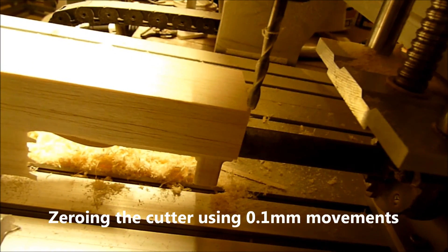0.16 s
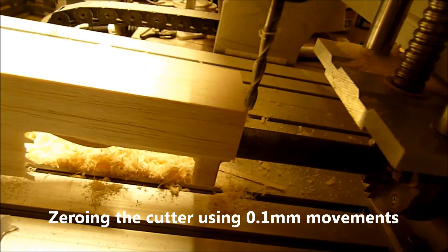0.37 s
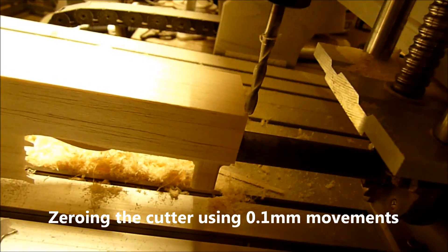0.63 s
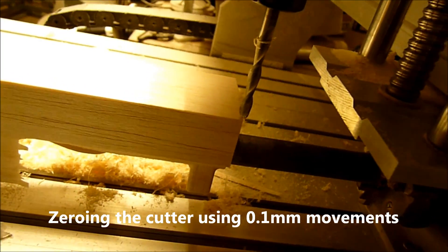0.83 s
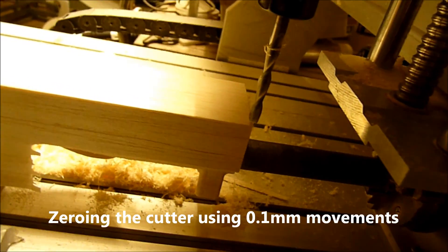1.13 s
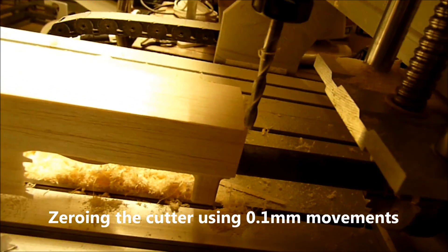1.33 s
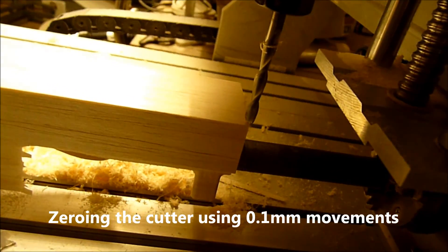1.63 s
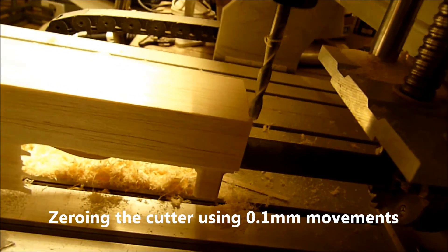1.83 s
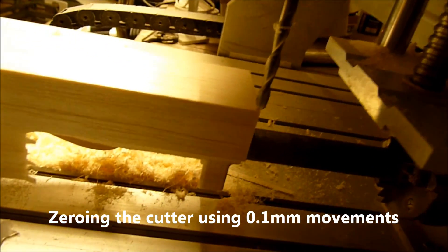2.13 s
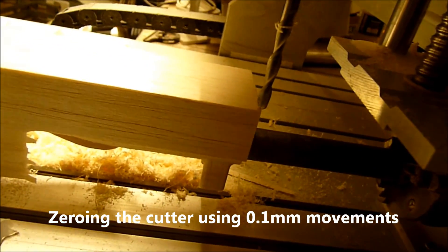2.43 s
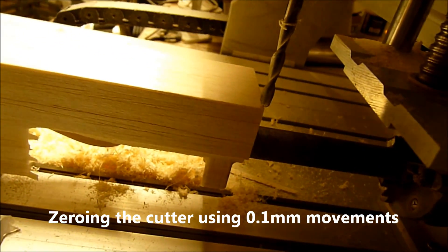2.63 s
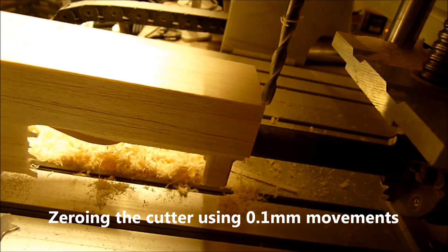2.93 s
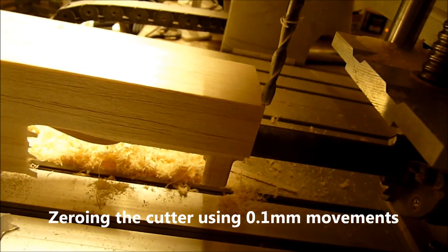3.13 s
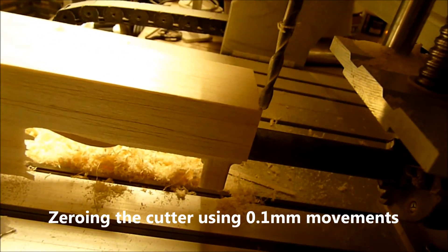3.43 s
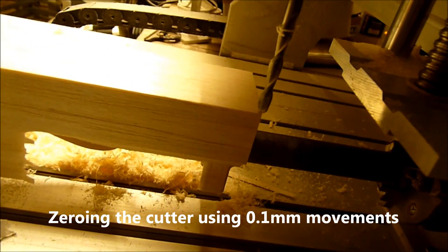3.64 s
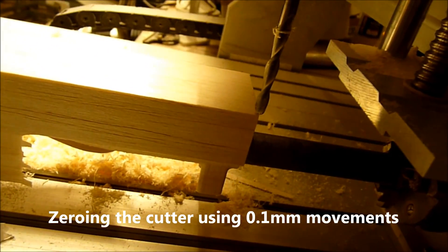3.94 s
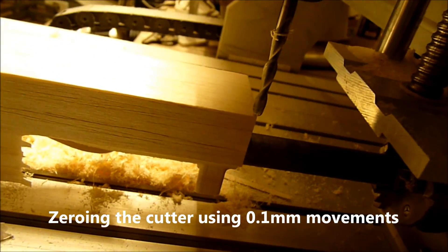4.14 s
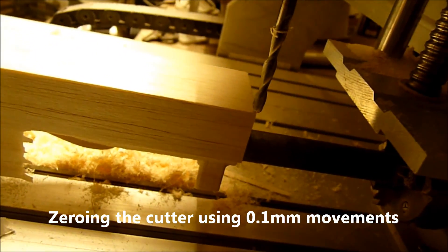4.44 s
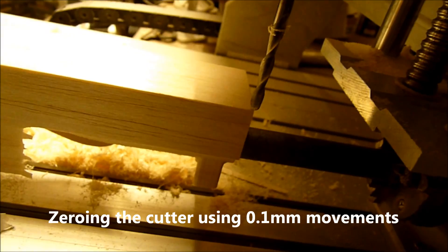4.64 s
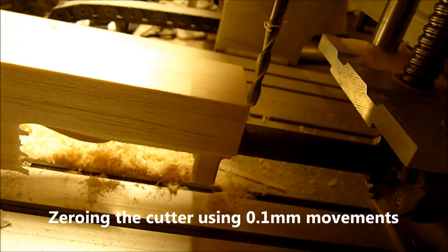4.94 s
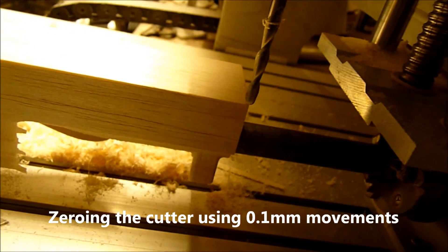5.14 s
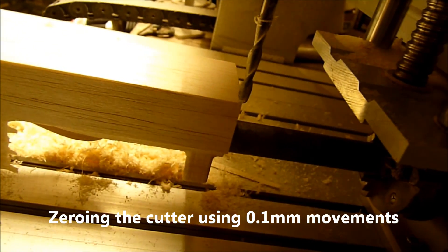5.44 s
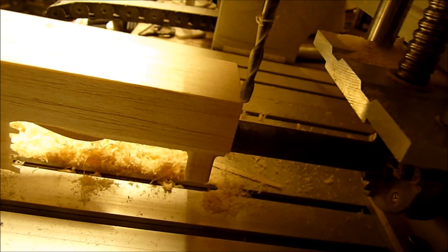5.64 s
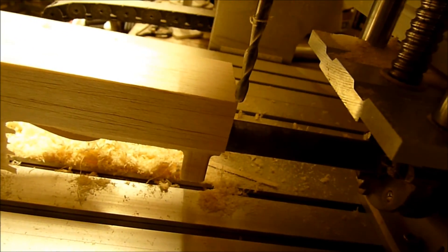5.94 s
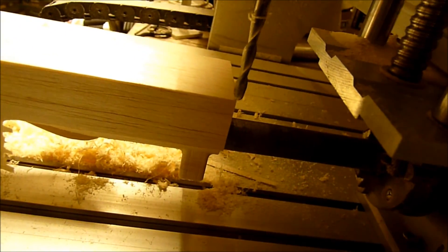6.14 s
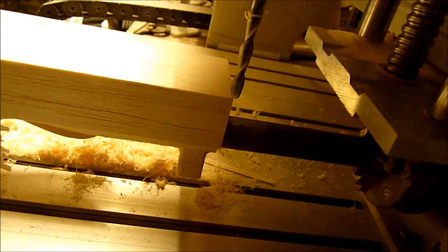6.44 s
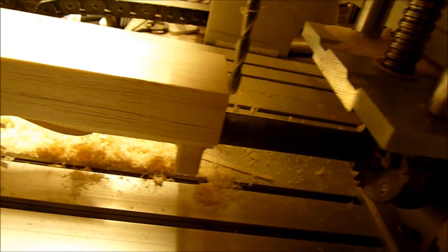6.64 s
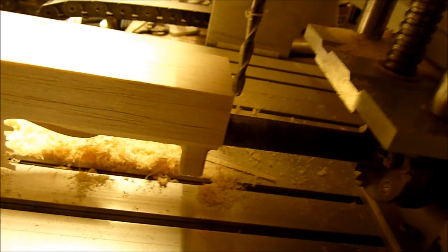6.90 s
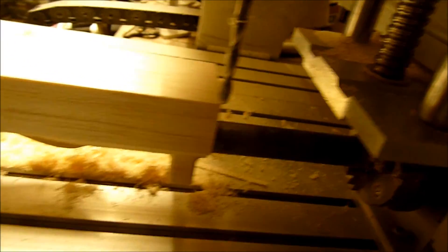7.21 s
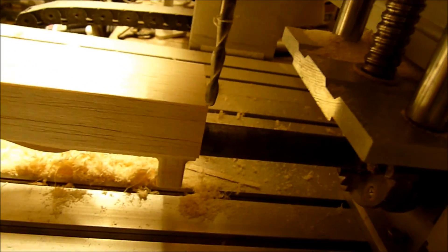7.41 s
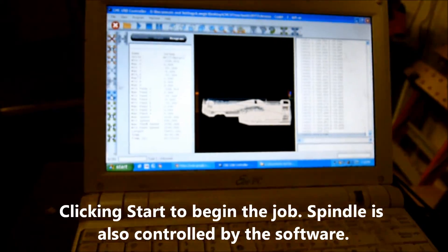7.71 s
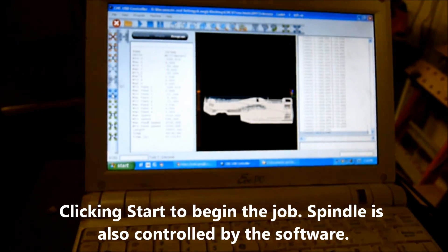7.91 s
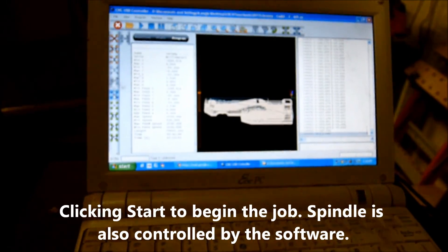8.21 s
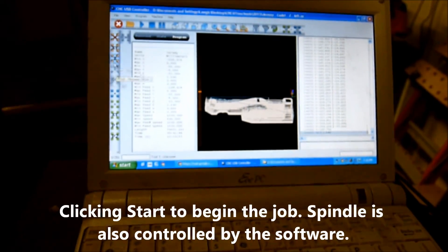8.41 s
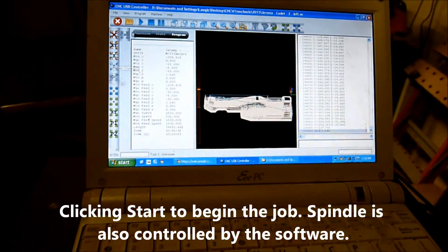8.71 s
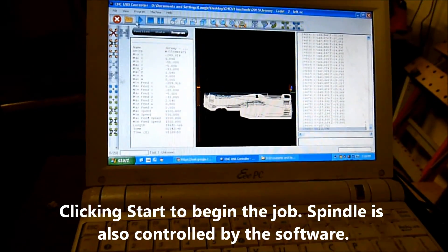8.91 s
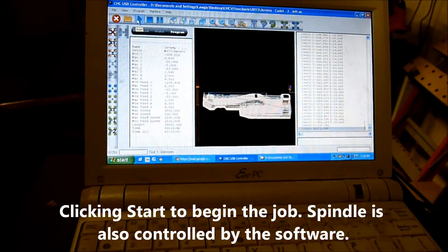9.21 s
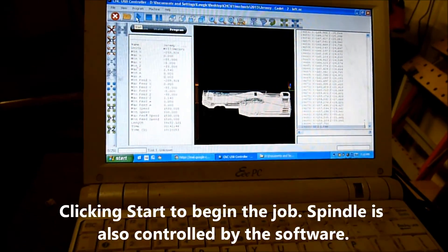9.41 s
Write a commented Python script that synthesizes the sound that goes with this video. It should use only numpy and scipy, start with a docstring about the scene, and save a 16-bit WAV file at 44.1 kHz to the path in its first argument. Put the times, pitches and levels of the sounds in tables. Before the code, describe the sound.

Cooling fans hum throughout in a workshop, with rushing air and a thin electrical whine. Right at the start, a small computer-controlled router close by makes one short move, a motor buzz between two jolts that ring its metal frame. From about 2.3 to 3.2 seconds come four tiny moves, each a brief buzzy knock, along with two faint key ticks. A louder run of ten quick, uneven knocks lasts from 3.4 to 4.9 seconds. Seven more, with a slightly different ring and rattle, follow from 5.4 to 6.7 seconds, while the fan's hum grows a little louder. A light, hard knock sounds at 7.4 seconds. At about 7.7 seconds the sound drops out for an instant, then the fans return with a stronger, higher tone, heard from beside a laptop until the end.

```python
"""Cooling fans hum in a workshop, and a small CNC router (a cutting machine) makes one short move.
Each move is a buzz of motor steps between two jolts, start and stop, that ring the metal frame.
From about 2.3 s come two faint key ticks and three runs of tiny moves, one run along each axis.
During the last run the listener leans toward a fan's outlet; a light knock follows at 7.4 s.
Then, after an instant of silence, the fans are heard from beside the control laptop."""
import sys
import numpy as np
from scipy import signal
from scipy.fft import rfft, irfft
from scipy.io import wavfile
from scipy.ndimage import uniform_filter1d

SR = 44100
rng = np.random.default_rng(int(sys.argv[2]) if len(sys.argv) > 2 else 0)


def dump(signal):
    """Clip the signal to [-1, 1] and save it as 16-bit WAV at the path in sys.argv[1]."""
    limited = np.clip(np.atleast_2d(signal).T, -1, 1)
    pcm = np.round(limited * 32767).astype(np.int16)
    wavfile.write(sys.argv[1], SR, pcm)


N = 421596
TIME = np.arange(N) / SR
RING_TIME = np.arange(SR) / SR  # one second, room for one move or knock to die away


def undb(db):
    """Turn decibels into a number to multiply by."""
    return 10 ** (np.asarray(db) / 20)


def add(track, start_s, sound):
    """Mix a sound into the track at its start time."""
    i = int(start_s * SR)
    track[i:i + len(sound)] += sound[:N - i]


def wander(rate):
    """A smooth random curve, about 1 in size, that heads for a new value `rate` times a second."""
    hold = int(SR / rate)
    stairs = np.repeat(rng.standard_normal(N // hold + 1), hold)
    curve = uniform_filter1d(uniform_filter1d(stairs, hold), hold)[:N]
    return curve / curve.std()


def noise(shape, size, peaks=()):
    """Noise of strength 1, shaped by (Hz, dB) points and by (Hz, width in Hz, dB) peaks or dips."""
    hz = np.arange(size // 2 + 1) * SR / size
    points, db = np.transpose(shape)
    colour_db = np.interp(np.log(hz + 1), np.log(points), db)
    for centre, width, boost_db in peaks:
        colour_db = colour_db + boost_db / (1 + (2 * (hz - centre) / width) ** 2)
    out = irfft(rfft(rng.standard_normal(size)) * undb(colour_db), size)
    return out / out.std()


# The tones of two fans. Each row: multiple of the blade rate, dB at the machine, dB at the laptop.
LOW_FAN = [(1, -46.5, -45.5), (2, -67.5, -60), (5, -78.5, -62), (7, -73.5, -84.5), (8, -72.5, -65),
           (9, -75.5, -71.5), (10, -88, -90), (11, -93.5, -76)]
HIGH_FAN = [(1, -53, -36), (2, -72, -49.5), (3, -59, -60.5), (4, -80, -58.5)]

def fan(tones, places, blade_hz, drift, flutter_db):
    """Passing blades hum; the speed drifts a little and each tone wavers in the swirling air."""
    phase = 2 * np.pi * np.cumsum(blade_hz * (1 + drift * wander(3))) / SR
    out = 0
    for multiple, *levels in tones:
        loudness = np.sqrt(2) * (undb(levels) @ places) * undb(flutter_db * wander(15))
        out = out + loudness * np.sin(round(multiple) * phase + .22 * wander(30))
    return out


# The whine of the motor drivers. Each row: pitch in Hz, dB at the machine, dB at the laptop.
WHINE = [(1167, -71, -70), (6666, -86, -85)]

def driver_whine(places):
    """The circuits that power the motors give off thin, slightly wavering tones."""
    return sum(np.sqrt(2) * (undb(levels) @ places) * np.sin(2 * np.pi * hz * TIME + wander(18))
               for hz, *levels in WHINE)


# The tone colour of the rushing air in each place. Each row: pitch in Hz, relative level in dB.
AIR_MACHINE = [(25, -19.5), (60, -9.5), (140, 0.5), (175, -4), (240, 5.5), (320, 2), (520, 0), (950, 0.5),
               (1150, -16), (1400, -16.5), (2050, -22), (2400, -27), (3600, -31.5), (7800, -34)]
AIR_LAPTOP = [(25, -34.5), (60, -15), (130, -10), (210, 4.5), (300, 1.5), (380, -4.5), (600, -7),
              (710, -7.5), (900, -7), (1100, -20), (1900, -21.5), (2400, -33), (3600, -39), (7800, -43)]
# Pitches that the casing, the outlet and the laptop boost or weaken.
# Each row: pitch in Hz, width in Hz, boost in dB.
CASING_PEAKS = [(214, 36, 5), (366, 7.6, -4.5), (435.3, 23, 6), (612, 34, -8.5), (737, 15, -5.5),
                (904.6, 16, 8), (1012, 28, 4.5)]
OUTLET_PEAKS = [(421.2, 15, 27.5), (729, 51, 21), (925, 76, 27), (1754, 310, 9.5)]
LAPTOP_PEAKS = [(370, 34, -3), (420.7, 29, 12.5), (620, 50, -4), (810, 37, -7.5), (833, 20, 8)]

def rushing_air(places, outlet_gain):
    """Air from the fans rushes through casing and outlet, or past the laptop, and makes them resonate."""
    outlet_shape = [(100, -10.5), (400, 2.5), (1900, -0.5), (3500, -21.5)]
    casing = undb(-40.5) * noise(AIR_MACHINE, N, CASING_PEAKS)
    outlet = undb(-52) * outlet_gain * noise(outlet_shape, N, OUTLET_PEAKS)
    laptop = undb(-36.5) * noise(AIR_LAPTOP, N, LAPTOP_PEAKS)
    air = places[0] * (casing + outlet) + places[1] * laptop
    return air * undb(0.5 * wander(6.6))


# The tone colour of a hollow note in the air. Each row: pitch in Hz, relative level in dB.
HOLLOW_SHAPE = [(560, -46.5), (660, -11.5), (715, 3), (765, -17), (850, -49.5)]
# Its usual level in dB: first at the machine, then at the laptop.
HOLLOW_DB = [-57.5, -54]

def hollow_note(places, swell_db=5.0):
    """A narrow, hollow band of the rushing air swells and fades several times a second."""
    band = (undb(HOLLOW_DB) @ places) * noise(HOLLOW_SHAPE, N)
    return band * undb(swell_db * np.minimum(wander(14), 2))


def ring(hz, fade_s, db, build, delay=0, lag=0):
    """A struck object's notes: each waits `lag` cycles, swells over `build`, falls 60 dB in fade_s."""
    out = 0
    for k, (pitch, fade, level) in enumerate(zip(hz, fade_s, db)):
        t = np.maximum(RING_TIME - delay - lag / pitch, 0)
        loudness = undb(level - 60 * t / fade) * (1 - np.exp(-t * pitch / build))
        out = out + (-1) ** k * loudness * np.sin(2 * np.pi * pitch * t)  # neighbours swing opposite ways
    return out


def gate(start, stop, ramp):
    """Fade in from start and be silent again by stop; all times are in seconds."""
    return np.clip((RING_TIME - start) / ramp, 0, 1) * np.clip((stop - RING_TIME) / ramp, 0, 1)


# The notes of the drive nut. Each row: pitch in Hz, fade time in seconds, relative level in dB.
CLACK_NOTES = [(1540, .025, -10.5), (1850, .035, -1.5), (2150, 0.061, -2.5), (2970, .07, -13)]

def nut_clack(db):
    """The nut clacks against its screw as a move starts."""
    return undb(db) * ring(*np.transpose(CLACK_NOTES), build=1.8, delay=.0008)


# The tone colour of the rattling screw and nut. Each row: pitch in Hz, relative level in dB.
RATTLE_SHAPE = [(30, -21.5), (60, -11.5), (160, -2), (300, 2), (550, 7), (1100, 6), (1400, -3.5),
                (2100, -11.5), (2500, -17.5), (3100, -23), (4000, -36), (8000, -43)]

def screw_rattle(length, step_phase, db, fade_s):
    """The loose nut chatters once per motor step, most at the start and again at the stop."""
    start_shake = undb(-60 * RING_TIME / fade_s)
    stop_shake = 0.43 * (RING_TIME > length) * undb(-60 * np.abs(RING_TIME - length) / fade_s)
    chatter = (1 + 0.28 * np.cos(step_phase)) * noise(RATTLE_SHAPE, SR)
    return undb(db) * (start_shake + stop_shake) * gate(0, 1, ramp=0.0022) * chatter


# The tones of a motor at full speed. Each row: pitch in Hz, relative level in dB.
DRONE_TONES = [(268, -30), (533, -36), (640, -40), (920, -39), (1066, -40)]

def motor_drone(stop_s, run_up_s=0.027, boost_db=5.5, fade_s=0.28):
    """Only a longer move gets up to speed and drones, most strongly at first."""
    tones = sum(undb(db) * np.sin(2 * np.pi * hz * RING_TIME) for hz, db in DRONE_TONES)
    loudness = undb(boost_db - 60 * (RING_TIME - run_up_s) / fade_s)
    return tones * loudness * gate(run_up_s, stop_s, ramp=0.0021)


def move(length, slack, modes, step_hz, step_db, build, lag, rattle_db, rattle_t60, clack_db, slack_db,
         scatter_db=1.2, varying_above_hz=780):
    """One move: a clack and a start jolt, a buzz of steps that rattles the screw, and a stop jolt."""
    hz, fade_s, start_db, stop_db = np.transpose(modes)
    # the frame's low notes ring alike on every move; the high ones vary
    change_db = (scatter_db * rng.standard_normal(len(hz)) + slack * slack_db) * (hz > varying_above_hz)
    start_jolt = ring(hz, fade_s, start_db + change_db, build, lag=lag)
    stop_jolt = ring(hz, fade_s, stop_db + change_db, build, delay=length, lag=lag)
    # the heavy frame rounds off each jolt, dulling it above 1500 Hz
    jolts = signal.sosfiltfilt(signal.butter(4, 1500, fs=SR, output="sos"), start_jolt + stop_jolt)
    clack = nut_clack(clack_db + scatter_db * rng.standard_normal())
    # a move this short never settles on quite the same step rate
    step_phase = 2 * np.pi * step_hz * (1 + .006 * rng.standard_normal()) * RING_TIME
    motor_stop_s = length + 0.0027
    buzz = undb(step_db + slack * slack_db) * gate(0, motor_stop_s, ramp=0.0035) * np.sin(step_phase)
    rattle = screw_rattle(length, step_phase, rattle_db, rattle_t60)
    return (clack + jolts + buzz + motor_drone(motor_stop_s) + rattle) * gate(-1, 1, ramp=0.22)


# The notes (modes) of the frame as each axis shakes it.
# Each row: pitch in Hz, fade time in seconds, dB at the start jolt, dB at the stop jolt.
X_MODES = [(53, 0.1, -57, -35.5), (121, 0.3, -62.5, -37.5), (124.9, 0.52, -28, -63.5),
           (157.7, 0.36, -27, -60), (195, 0.092, -23.5, -21.5), (237, 0.52, -57.5, -38.5),
           (251, 0.077, -39, -22.5), (322, 0.089, -34.5, -25), (348, 0.049, -48.5, -18),
           (456, 0.37, -39.5, -63), (520, 0.16, -63, -38), (605, .16, -55, -50), (647, .38, -37.5, -48),
           (710, .3, -57, -46), (883, 0.063, -26.5, -27), (928, 0.67, -35.5, -73),
           (1005, 0.3, -36.5, -63.5)]
Y_MODES = [(63.6, 0.11, -31.5, -58.5), (98, 0.68, -38, -58), (119.8, 0.26, -23, -23),
           (130, 0.55, -19, -23.5), (148.5, 2.4, -41.5, -52), (185.7, 0.097, -17.5, -59.5),
           (231.4, 0.52, -35, -33.5), (294.1, 0.19, -28.5, -60), (309, 0.064, -56, -17.5),
           (404, 0.066, -66, -32), (450, 0.17, -32.5, -60), (522, .13, -43, -39), (651, .106, -55, -39.5),
           (710, 0.29, -36.5, -56), (843, 0.79, -42, -61.5), (856.4, 0.16, -21, -28.5),
           (928, 0.096, -24.5, -41), (1052, .28, -45.5, -49)]
Z_MODES = [(51.7, 0.063, -31, -50), (96, 0.65, -33.5, -59), (129.8, 0.25, -18.5, -25),
           (156, 0.76, -64, -34), (173.7, 0.85, -44, -52), (198.7, 0.16, -24, -19.5),
           (229.6, 0.6, -48.5, -35.5), (273.6, 0.24, -23, -28.5), (310.3, 0.12, -31.5, -20.5),
           (359.5, 0.24, -34.5, -56.5), (409.5, 0.27, -47.5, -37.5), (524.6, 0.26, -48.5, -36),
           (603, 0.14, -54.5, -39), (633, 0.29, -38.5, -54.5), (720, 0.023, -32, -46.5),
           (941, 0.081, -40, -28), (1105, 0.18, -64.5, -47)]
# The drive of each axis. Each entry: frame notes, step rate in Hz, buzz in dB, build and lag in cycles,
# rattle in dB, its fade time in seconds, clack in dB, dB that full slack adds to buzz and high notes.
AXES = {"X": dict(modes=X_MODES, step_hz=913, step_db=-43.5, build=0.52, lag=0.072, rattle_db=-43.5, rattle_t60=.11, clack_db=-51, slack_db=2.5),
        "Y": dict(modes=Y_MODES, step_hz=898.6, step_db=-27, build=1.39, lag=0.51, rattle_db=-37, rattle_t60=0.11, clack_db=-55.5, slack_db=-3.5),
        "Z": dict(modes=Z_MODES, step_hz=967, step_db=-36, build=0.11, lag=0.66, rattle_db=-39.5, rattle_t60=0.23, clack_db=-46, slack_db=-0.5)}
# Runs of equal tiny moves on one axis, in quick, uneven succession. Each row: start in seconds, axis,
# length of a move in seconds, waits before each further move in clock beats.
RUNS = [(.0175, "X", .097, []), (2.3748, "X", .0142, [26, 15, 7]),
        (3.422, "Y", .0203, [13, 11, 9, 10, 9, 11, 7, 9, 10]), (5.4045, "Z", .0124, [14, 9, 11, 13, 9, 25])]

def router(clock_hz=64.035, slack_moves=1.9):
    """The moves of a run fall on the controller's clock; the first few take up the nut's slack."""
    out = np.zeros(N)
    for start_s, axis, length, waits in RUNS:
        for count, beat in enumerate(np.cumsum([0] + waits)):
            slack = np.exp(-count / slack_moves)
            add(out, start_s + beat / clock_hz, move(length, slack, **AXES[axis]))
    return out


def workshop_echo(sound, echo_db=-19, fade_s=0.17):
    """Walls and benches add a short echo to the sound, with hardly any bass in it."""
    tail = noise([(200, -20), (450, -2), (1500, 0), (6000, -6)], SR)
    tail = tail * undb(-60 * RING_TIME / fade_s) * gate(0.019, 1, ramp=0.018)
    echo = signal.fftconvolve(sound, tail / np.sqrt(np.sum(tail ** 2)))[:N]
    return sound + undb(echo_db) * echo


# Faint ticks of a key. Each row: start in seconds, pitch in Hz, level in dB.
KEY_TICKS = [(2.346, 2600, -50), (3.0065, 2640, -45)]

def key_ticks(fade_s=0.014):
    """A plastic key ticks with three short notes that lie close together."""
    out = np.zeros(N)
    for start_s, hz, db in KEY_TICKS:
        add(out, start_s, ring([0.96 * hz, hz, 1.09 * hz], [fade_s] * 3, [db] * 3, build=2))
    return out


# The light knock. Each row: start in seconds, change of level in dB.
KNOCKS = [(7.437, -2.5)]
# The notes it rings. Each row: pitch in Hz, fade time in seconds, relative level in dB.
KNOCK_NOTES = [(248, 0.047, -17), (430, 0.069, -26), (674, 0.074, -22.5), (890, 0.083, -28),
               (1064, 0.093, -24.5), (1216, 0.085, -27.5), (1700, .045, -35.5), (2050, .04, -39),
               (2670, .025, -43), (3230, .022, -47), (4050, .022, -52)]

def knock(crack_db=-35, crack_fade_s=0.086):
    """A light, hard knock: short ringing notes and a crack of noise."""
    out = np.zeros(N)
    crack_shape = [(60, 4), (300, -14), (1200, 1), (1500, -7), (3000, -14), (4300, -22), (6000, -49)]
    for start_s, db in KNOCKS:
        crack = noise(crack_shape, SR) * gate(0, 1, ramp=.0008)
        crack = crack * undb(crack_db - 60 * RING_TIME / crack_fade_s)
        notes = ring(*np.transpose(KNOCK_NOTES), build=0.91)
        add(out, start_s, undb(db) * (notes + crack))
    return out


def lean_to_outlet(start_s=5.2, end_s=7.84, ramp_s=0.69, far_db=-1, near_db=2.5):
    """The fan's outlet grows louder as the listener leans in, holds, and falls back."""
    lean = np.clip(np.minimum(TIME - start_s, end_s - TIME) / ramp_s, 0, 1)
    return undb(far_db + (near_db - far_db) * lean)


def scene(leave_s=7.662, arrive_s=7.674):
    """First the machine close by, then the place beside the laptop."""
    # two on/off curves: the first is 1 while at the machine, the second while at the laptop
    places = uniform_filter1d(np.array([TIME < leave_s, TIME > arrive_s], float), size=32, axis=1)
    machine = places[0] * workshop_echo(router() + knock() + key_ticks())
    outlet_gain = lean_to_outlet()
    leaning_places = np.array([outlet_gain * places[0], places[1]])
    low_fan = fan(LOW_FAN, places, blade_hz=245.75, drift=0.00075, flutter_db=1.0)
    high_fan = fan(HIGH_FAN, leaning_places, blade_hz=430, drift=0.001117, flutter_db=1.13)
    hum = low_fan + high_fan + driver_whine(places) + rushing_air(places, outlet_gain)
    return (machine + hum + hollow_note(places))[None]


def record(dry, hiss_db=-68, top_hz=7750):
    """Add a faint, even hiss and cut away the highest treble."""
    hissing = dry + undb(hiss_db) * rng.standard_normal(N)
    return signal.sosfilt(signal.ellip(10, .2, 60, top_hz, fs=SR, output="sos"), hissing)


dry = scene()
out = record(dry)
dump(out)
```